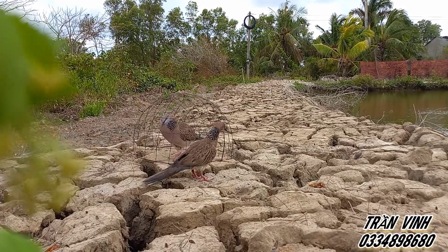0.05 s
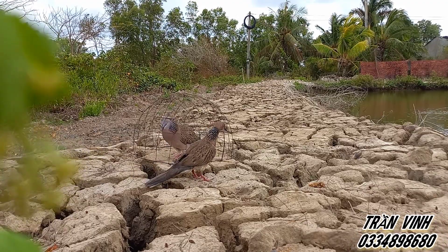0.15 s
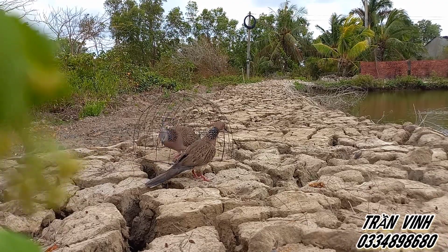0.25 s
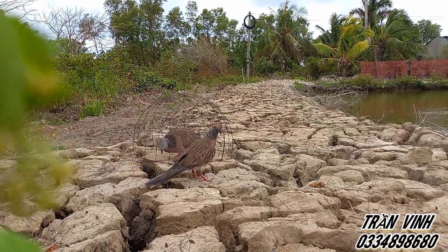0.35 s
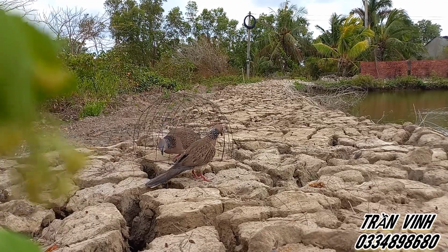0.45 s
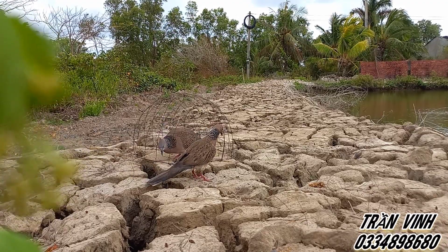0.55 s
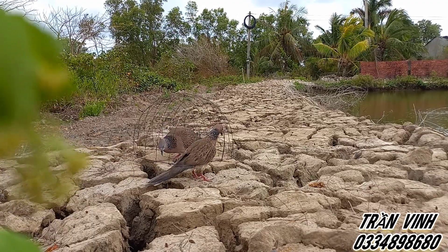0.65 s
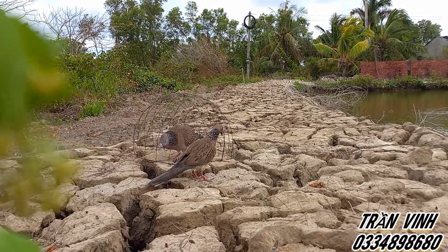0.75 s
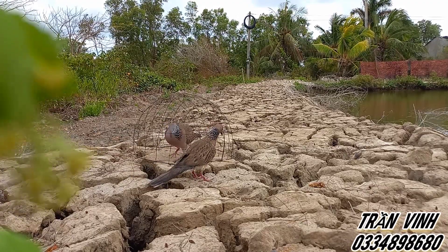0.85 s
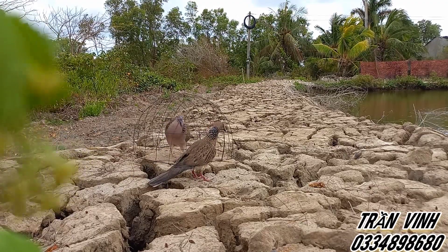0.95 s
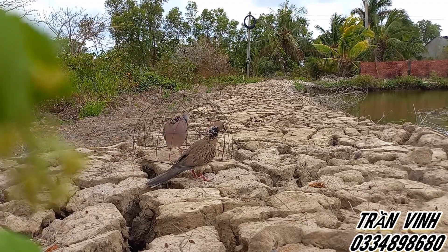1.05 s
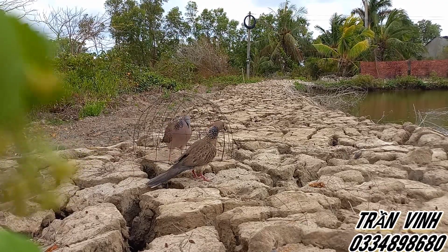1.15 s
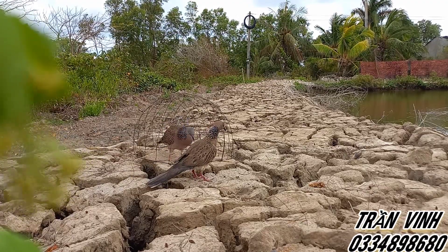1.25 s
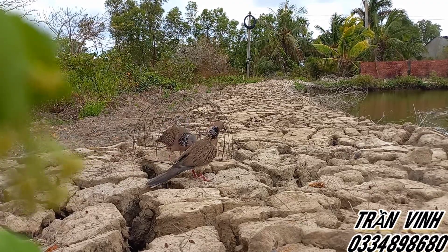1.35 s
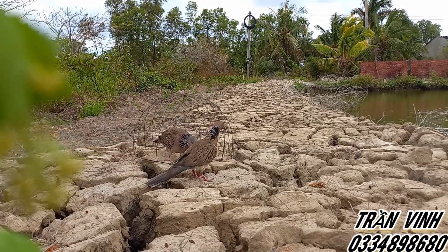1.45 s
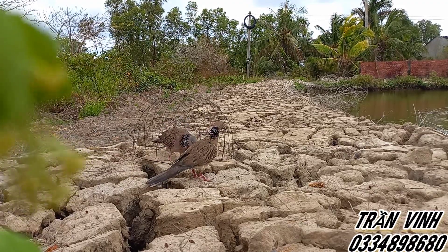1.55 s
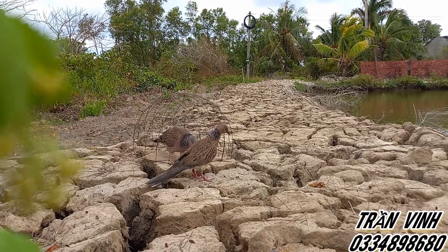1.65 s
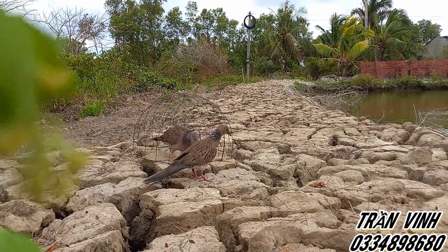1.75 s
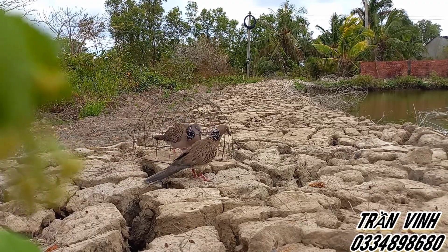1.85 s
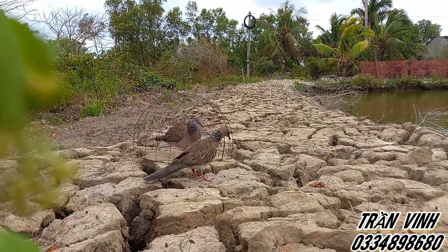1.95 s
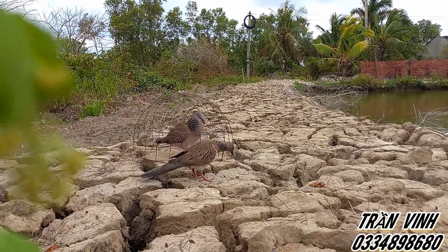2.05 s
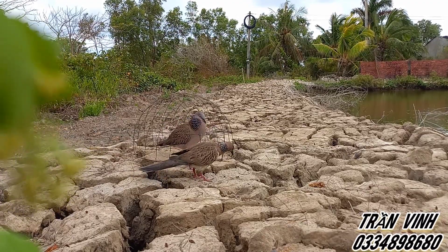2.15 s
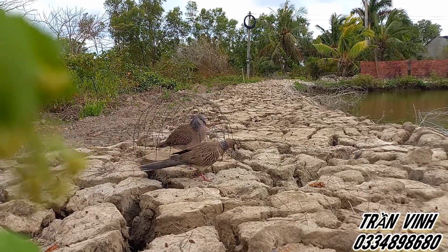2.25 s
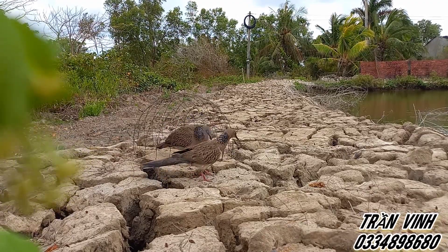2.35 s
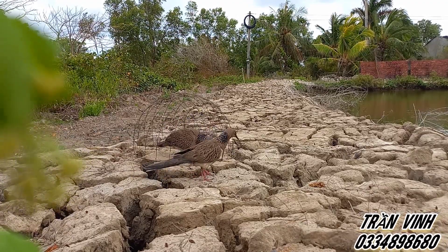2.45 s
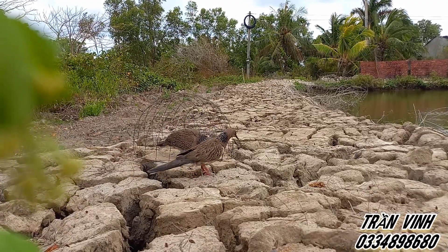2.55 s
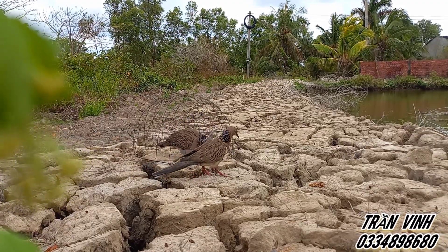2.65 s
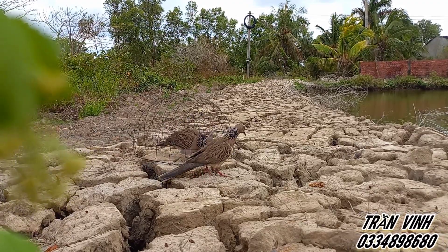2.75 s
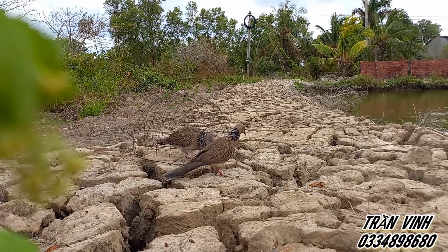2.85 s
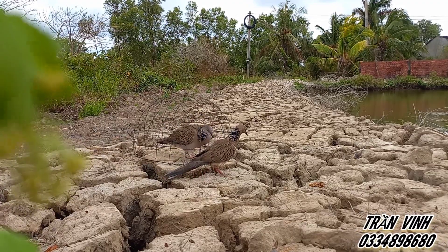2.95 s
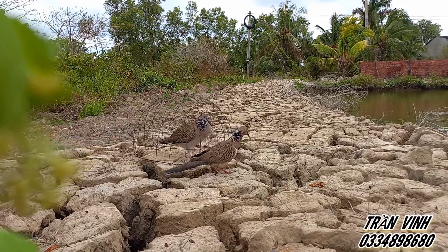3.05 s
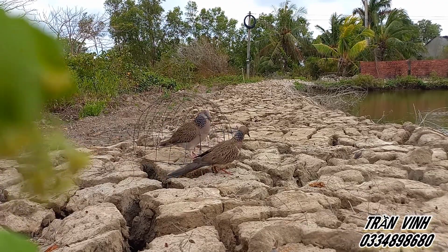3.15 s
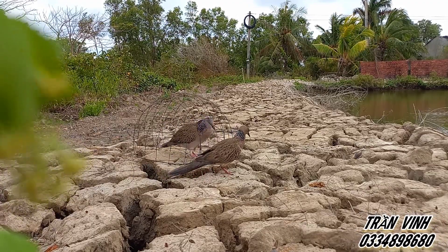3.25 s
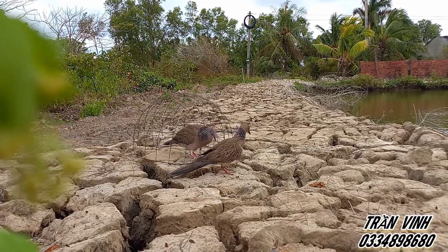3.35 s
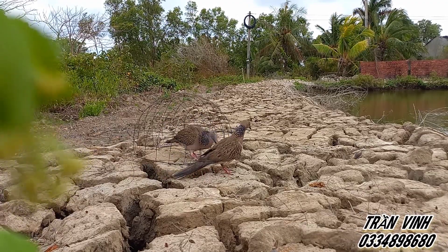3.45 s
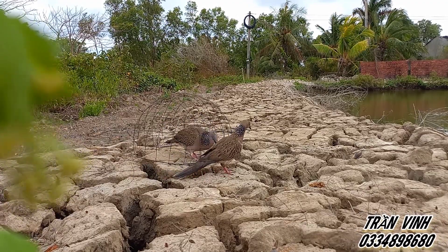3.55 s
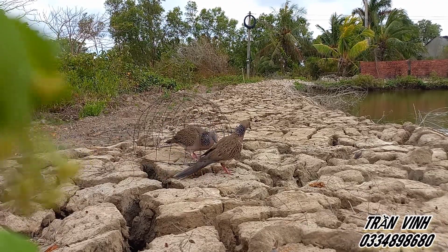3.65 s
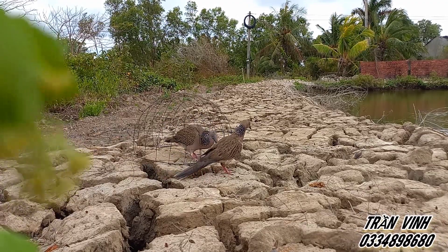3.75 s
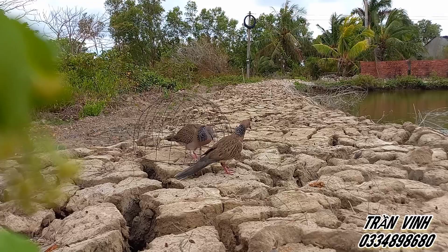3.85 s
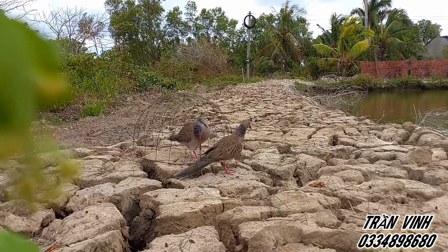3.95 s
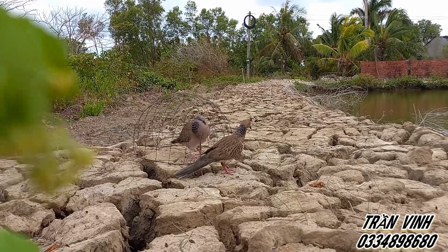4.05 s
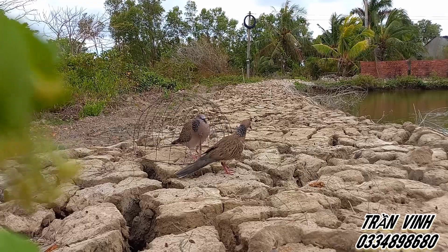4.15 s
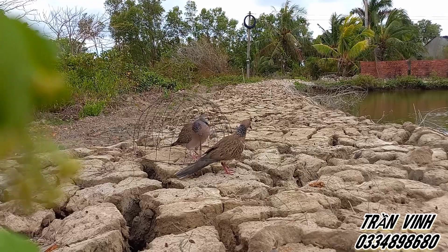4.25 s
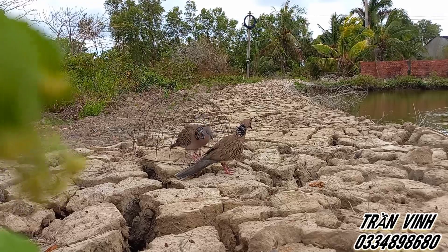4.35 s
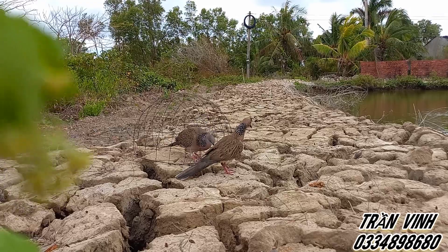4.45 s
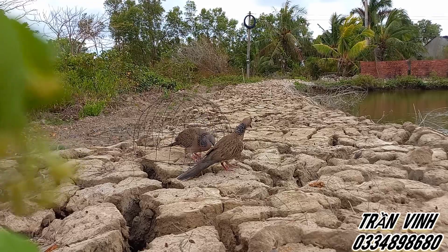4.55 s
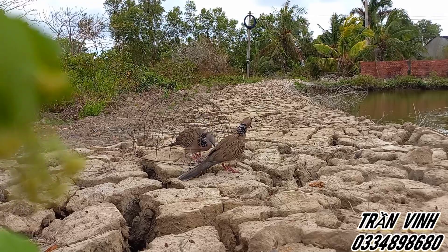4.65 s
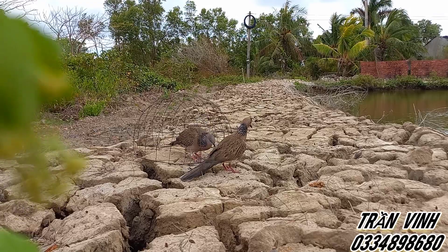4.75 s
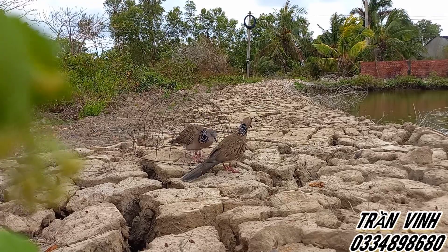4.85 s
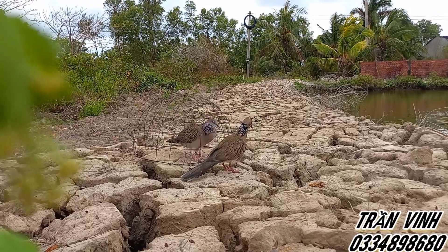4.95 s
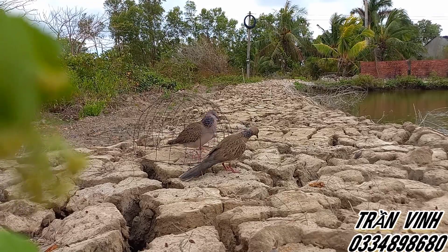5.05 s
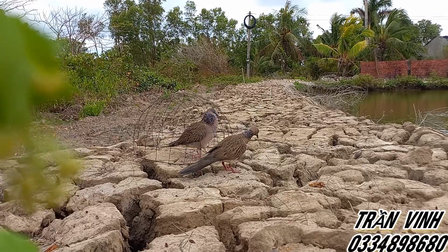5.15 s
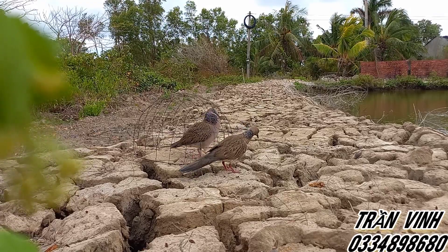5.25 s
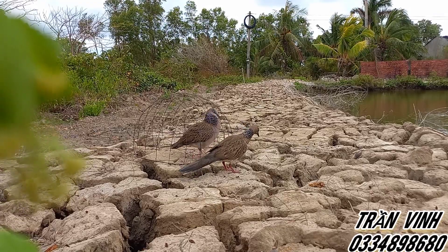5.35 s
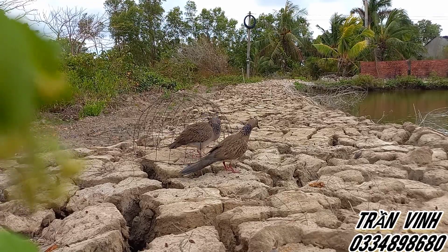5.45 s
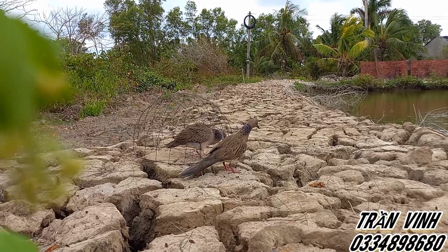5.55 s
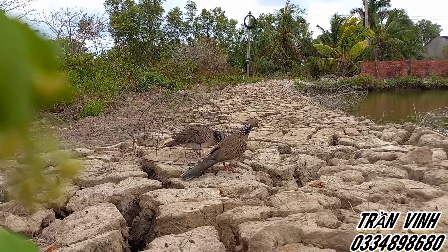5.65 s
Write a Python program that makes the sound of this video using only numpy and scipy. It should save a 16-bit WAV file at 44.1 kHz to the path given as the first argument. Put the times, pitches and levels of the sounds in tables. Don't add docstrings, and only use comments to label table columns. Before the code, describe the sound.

A dove coos close to a small stereo camera microphone on dry ground beside a pond, nearly centred and almost without echo. Five bouts begin near 0.2, 1.2, 2.3, 3.3 and 4.3 seconds. Each opens with a roll of under 0.2 seconds, rapid throaty throbs swelling in a mid-pitched purr. After a short gap, a second roll starts near 0.5, 1.55, 2.65, 3.6 and 4.6, settling into a smooth, hollow, whistle-like tone with small throat catches, sagging and sliding down by about 1, 2, 3.1, 4 and 5 seconds. Later bouts are slightly softer. Tiny bright ticks of beak or claws fall around 0.2, 1.0, 1.2, 2.3, 3.3, 3.4, 3.9 and 4.3. Very quiet engine drone, air hiss, insect shimmer and faint cricket chirrs lie beneath, swelling with the coos; low wind flutters on the right, strongest near 0.9. After the last coo, only faint background remains.

```python
import sys
import numpy as np
from scipy import signal
from scipy.fft import rfft, irfft
from scipy.io import wavfile
from scipy.ndimage import uniform_filter1d, map_coordinates

SR = 44100
rng = np.random.default_rng(int(sys.argv[2]) if len(sys.argv) > 2 else 0)


def transcribe(u):
    v = np.clip(np.atleast_2d(u).T, -1, 1)
    q = np.round(v * 32767).astype(np.int16)
    wavfile.write(sys.argv[1], SR, q)


def voltage_ratio(level):
    return 10 ** (np.asarray(level, float) / 20)


N = 251370

# (start [s], length [s], level [dB], throbs [count])
LONG_ROLLS = [
    (0.5214, 0.17, 1, 16),
    (1.5504, 0.19, 0, 16),
    (2.6541, 0.16, -0.48, 13),
    (3.5947, 0.17, -0.63, 15),
    (4.6177, .148, -1.9, 13),
]


def unit(x):
    return x / np.sqrt(np.mean(x ** 2) + 1e-20)


def along(points, hz):
    f, v = np.transpose(points)
    return np.interp(np.log(hz + 1), np.log(f + 1), v)


def wobble(rate):
    knots = rng.standard_normal(int(N * rate / SR) + 4)
    return map_coordinates(knots, [np.arange(N) * rate / SR])


def noise(gain, patchy_db):
    z = signal.stft(rng.standard_normal(N), nperseg=512)[2]
    field = uniform_filter1d(rng.standard_normal(z.shape), size=5, axis=0)
    field = uniform_filter1d(field, size=8, axis=1)
    x = signal.istft(z * voltage_ratio(patchy_db * unit(field)), nperseg=512)[1][:N]
    return unit(irfft(rfft(x) * gain(np.fft.rfftfreq(N, 1 / SR)), N))


def engine(opening):
    # (pitch [Hz], level [dB])
    drone_colour = [(20, -37), (45, -23), (63, -6.5), (90, -4), (110, -9), (127, 3), (150, -11.5),
                    (200, -10.5), (250, -16), (280, -10), (320, -19), (500, -27), (900, -40), (1200, -120)]
    # (time [s], level [dB])
    engine_level = [(0, -51.5), (.15, -46), (.5, -52), (.85, -46), (1.3, -53), (1.75, -49.5), (2.25, -55),
                    (2.7, -52.5), (3.4, -51.5), (3.75, -57), (3.96, -48), (4.3, -53.5), (4.9, -49),
                    (5.3, -61), (5.7, -51.5)]
    # (from [s], to [s])
    lulls = [(2.44, 2.94), (2.97, 3.57), (3.87, 4.12), (4.21, 4.27), (4.43, 4.66), (4.82, 5.06)]
    cut_db, cut_lift_db = -25, 6.5
    t = np.arange(N) / SR
    lull = uniform_filter1d(sum(1. * (t > a) * (t < b) for a, b in lulls), size=900)
    drone, other = [noise(lambda hz: voltage_ratio(along(drone_colour, hz)), patchy_db=3.5) for _ in range(2)]
    level = voltage_ratio(np.interp(t, *np.transpose(engine_level)) + 0.33 * wobble(21))
    in_lull = lull * (0.65 * drone + .5 * other)
    through_cut = voltage_ratio(cut_db + cut_lift_db * opening) * (0.83 * drone + .65 * other)
    return level * np.array([drone, in_lull + through_cut])


def wind(opening):
    # (pitch [Hz], level [dB])
    flutter_colour = [(40, -36), (150, -20), (220, -20), (320, 3.5), (450, 1), (600, -12.5), (900, -26),
                      (1300, -120)]
    # (time [s], level [dB])
    gusts = [(0, -53), (.3, -61.5), (.55, -62.5), (.9, -43.5), (1.15, -67.5), (1.35, -48.5), (1.55, -66.5),
             (1.7, -50.5), (2.1, -66), (2.45, -71), (3, -65.5), (3.5, -72.5), (3.7, -56.5), (4.1, -73.5),
             (4.45, -61), (5, -65), (5.3, -74.5), (5.7, -75.5)]
    lift_db = 9
    flutter = noise(lambda hz: voltage_ratio(along(flutter_colour, hz)), patchy_db=1.0)
    flutter = unit(voltage_ratio(1.0 * wobble(25)) * flutter)
    gust_db = np.interp(np.arange(N) / SR, *np.transpose(gusts))
    return voltage_ratio(gust_db + lift_db * opening) * flutter * [[0], [1]]


def air(opening):
    # (pitch [Hz], level [dB])
    air_colour = [(240, -43.5), (400, -16.5), (535, -5), (860, -9.5), (929, -8), (1660, -12.5), (3210, -17),
                  (4780, -20), (6300, -19), (15500, -18.5)]
    hiss = [noise(lambda hz: voltage_ratio(along(air_colour, hz)), patchy_db=2.2) for _ in "LR"]
    return voltage_ratio(-69 + 5.5 * opening) * np.array(hiss)


def shimmer(opening):
    # (centre [Hz], width [Hz], level [dB], left raised and right lowered by [dB], noise reducer's lift
    # [dB])
    bands = [
        (8520, 590, -81.5, 2.5, 7.5),
        (2000, 510, -82, -2.5, 8),
        (1200, 290, -90, 0, 22.5),
    ]
    out = np.zeros((2, N))
    for centre_hz, width_hz, level_db, pan_db, lift_db in bands:
        song = [noise(lambda hz: np.exp(-((hz - centre_hz) / width_hz) ** 2), patchy_db=-1.5) for _ in "LR"]
        level = voltage_ratio(level_db + lift_db * opening + 1.6 * wobble(8.7))
        out += level * np.array(song) * voltage_ratio([[pan_db], [-pan_db]])
    return out


def cricket():
    # (middle [s], half length [s], level [dB])
    phrases = [(0.638, 0.095, -78), (1.673, 0.063, -80), (2.794, 0.073, -83), (3.749, 0.065, -86),
               (4.722, 0.079, -78.5)]
    t = np.arange(N) / SR
    swell = sum(voltage_ratio(db) * np.exp(-((t - s) / half) ** 2) for s, half, db in phrases)
    chirr = [noise(lambda hz: np.exp(-((hz - 6450) / 110) ** 2), patchy_db=3.0) for _ in "LR"]
    return swell * np.array(chirr)


def ticks():
    # (time [s], peak [dB], ring pitch [Hz], left over right [dB])
    taps = [(0.1877, -48, 8820, 11), (0.9978, -49, 8680, 4), (1.2217, -53, 10300, -1),
            (2.3317, -56.5, 10800, 7), (3.286, -56, 8370, 11.5), (3.4189, -50, 7180, -2.5),
            (3.9048, -48, 8230, -2), (4.3044, -51, 7560, 1.5)]
    out, t = np.zeros((2, N)), np.arange(SR // 100) / SR
    for s, peak_db, hz, pan_db in taps:
        fade = voltage_ratio(peak_db - 3 - 60 * t / 0.0044) * (1 - np.exp(-t / .0002))
        ring = fade * (np.sin(2 * np.pi * hz * t) + .5 * rng.standard_normal(len(t)))
        both = np.diff(ring, prepend=0) * voltage_ratio([[pan_db / 2], [-pan_db / 2]])
        out[:, round(s * SR):][:, :len(t)] += both
    return out


def throbs(rows, shape, scatter):
    gap_scatter, db_scatter, hz_scatter, depth_scatter_db = .05, 1, 14, 3
    hz_per_db = 14
    share, peaks, pitches, depths, gaps = np.transpose(shape)
    fine = np.linspace(0, 1, num=200)
    beats = np.cumsum(1 / np.interp(fine, share, gaps))
    beats = (beats - beats[0]) / (beats[-1] - beats[0])
    for (start, length, level_db, count), luck in zip(rows, rng.standard_normal((len(rows), 4, 30))):
        k = np.arange(round(count) + 1)
        luck = scatter * np.clip(luck[:, k], -2, 1) * (k > 0) * (k < k[-1])
        at = np.interp((k + gap_scatter * luck[0]) / k[-1], beats, fine)
        louder_db = db_scatter * luck[1]
        peak_db = np.interp(at, share, peaks) + level_db + louder_db
        pitch_hz = np.interp(at, share, pitches) + hz_scatter * luck[2] + hz_per_db * louder_db
        depth_db = np.maximum(np.interp(at, share, depths) + depth_scatter_db * luck[3], 0)
        weaker_side_db = np.minimum(peak_db, np.r_[peak_db[1:], 0])
        yield start + at * length, peak_db, pitch_hz, weaker_side_db - depth_db


def roll(glide_hz, reach, flip):
    # (start [s], length [s], level [dB], throbs [count])
    short_rolls = [(.2003, 0.19, 1, 18), (1.2337, 0.19, 1, 17), (2.3449, 0.18, 0, 17),
                   (3.2995, .17, -0.5, 18), (4.3169, 0.18, -1, 18)]
    # (share of its length [0-1], peak [dB], pitch [Hz], valley depth [dB], throb gap
    short_shape = [(0, -41, 523.4, 0, 10), (.1, -22.5, 648.8, 11, 9.1), (0.199, -21.5, 704, 15, 14),
                   (.4, -19, 674.7, 13, 11.3), (.54, -17.5, 634.4, 8.5, 10), (.72, -14.5, 689.5, 10.5, 10),
                   (.88, -15, 643.1, 11, 11), (0.946, -28.5, 542.7, 17, 8.3), (1, -54, 463, 0.5, 9)]
    long_shape = [(0, -41, 585, 0.5, 10), (0.099, -32, 612, 4.5, 12.6), (.17, -19.5, 690, 17, 11.2),
                  (0.349, -17.5, 706, 16.5, 15.7), (.7, -16, 685.8, 13, 9.8), (1, -16, 693.5, 14.5, 12)]
    hz, size = np.full(N, 500.), np.zeros(N)
    rolls = [*throbs(short_rolls, short_shape, 1), *throbs(LONG_ROLLS, long_shape, 1.6)]
    for s, peak_db, centre_hz, valley_db in rolls:
        n = np.arange(int(s[0] * SR), int(s[-1] * SR))
        place = np.interp(n / SR, s, np.arange(len(s)))
        k, u = place.astype(int), place % 1
        side_db = np.where(u < .5, peak_db[k], peak_db[k + 1])
        throat_open = abs(np.cos(np.pi * u)) ** 2.1
        deep = np.clip((np.minimum(peak_db[k], peak_db[k + 1]) - valley_db[k] - 13.5) / 3, 0, 1)
        valley = voltage_ratio(valley_db[k]) * (1 - flip * deep)
        size[n] = throat_open * voltage_ratio(side_db) + (1 - throat_open) * valley
        swing = glide_hz * np.clip((peak_db - valley_db) / 12, 0, 1)[:-1]
        gap = np.diff(s) * min(reach, .45)
        times = np.c_[s[:-1], s[:-1] + gap, s[1:] - gap].ravel()
        pitches = np.c_[centre_hz[:-1], centre_hz[:-1] + .25 * swing, centre_hz[1:] - swing].ravel()
        hz[n] = np.interp(n / SR, times, pitches)
    return hz, size


def held(drop_hz, rebound, settle_s):
    # (break [s], top pitch [Hz], level [dB], tail [s])
    tones = [(.889, 760.4, -20, .083), (1.937, 757, -20, .079), (3.009, 753, -22, .071),
             (3.943, 749.6, -21.5, 0.07), (4.984, 746.6, -22, .068)]
    # (time [s], share of the tone lost [0-1], half length [s])
    catches = [(.713, 0.76, 0.0051), (0.783, 0.7, 0.0034), (0.809, 0.3, 0.003), (1.749, .7, .008),
               (1.782, 0.85, 0.004), (1.803, 0.7, .0045), (2.822, .8, 0.0055), (2.844, 0.91, 0.0049),
               (3.874, 0.5, 0.0034), (4.785, 0.72, 0.0034), (4.81, 0.7, 0.0026)]
    # (time from it [s], pitch drop [Hz], gain [dB])
    sagging = [(-.22, 0, -.3), (-.15, 7, 0), (-.09, 20, .5), (-.045, 40, 1.5), (-.02, 62, 3), (0, 92, 4.5)]
    # (share of the tail [0-1], pitch drop [Hz], gain [dB])
    tail_shape = [(.08, 110, 3.5), (.16, 165, -4.5), (.63, 195, -8), (.82, 275, -19), (1, 350, -30)]
    hz, size, t = np.zeros(N), np.zeros(N), np.arange(N) / SR

    def bump(s, half):
        return np.exp(-((t - s) / half) ** 2 * 2)

    choke, low, surge = np.zeros((3, N))
    for s, share, half in catches:
        choke += share * bump(s, half)
        low += share * np.sqrt(half / 0.0047) * bump(s + 0.78 * half, 1.6 * half)
        surge += share * (bump(s + 1.4 * half, half) - .4 * bump(s + 2.8 * half, .6 * half))
    for (roll_s, length, *_), (knee, top_hz, note_db, tail) in zip(LONG_ROLLS, tones):
        start = roll_s + length
        sliding = [(share * tail, fall_hz, db) for share, fall_hz, db in tail_shape]
        s, sag_hz, gain_db = np.transpose(sagging + sliding)
        on = (t >= start - 1 / 1000) & (t < knee + tail)
        after = t[on] - knee
        last = np.exp(-np.maximum(t[on] - start, 0) / settle_s)
        hz[on] = top_hz - np.interp(after, s, sag_hz) - drop_hz * low[on] - 45 * last
        strength = np.sqrt(2) * voltage_ratio(note_db + np.interp(after, s, gain_db) + 2.5 * last)
        size[on] = strength * np.clip(1 - choke[on] + rebound * surge[on], 0, 2)
    return hz, size


def dove():
    # (pitch [Hz], level [dB])
    overtone = [(400, -52.5), (480, -62), (560, -71.5), (600, -79), (680, -65.5), (750, -72)]
    roll_hz, roll_size = roll(glide_hz=94.44, reach=0.35, flip=5.9)
    held_hz, held_size = held(drop_hz=150, rebound=.5, settle_s=.004)
    hz = uniform_filter1d(np.where(held_hz > 0, held_hz, roll_hz), size=70) + 4.4 * wobble(150)
    size = np.where(held_hz > 0, held_size, roll_size)
    size = signal.fftconvolve(size, np.hanning(130) / 64.5, "same")
    size = size * voltage_ratio(0.3 * wobble(100))
    phase = 2 * np.pi * np.cumsum(hz) / SR
    rolling = uniform_filter1d(1. * (held_hz == 0), size=600)
    second = np.sqrt(2) * voltage_ratio(along(overtone, hz) + 2.5 * wobble(70))
    second = second * np.clip(size / 0.0067, 0, 1) * (1 - 0.54 * rolling)
    breath = noise(lambda f: np.exp(-((f - 800) / 250) ** 2), patchy_db=2)
    rasp = voltage_ratio(-32) * size * (0.34 + rolling) * breath
    return size * np.sin(phase) + second * np.sin(2 * phase + 0.23 * wobble(120)) + rasp


def banks(x):
    # (pitch [Hz], time to fall 60 dB [s])
    fading = [(400, 0.15), (720, 0.27), (4000, .05)]
    hz, t, z = signal.stft(rng.standard_normal((2, SR // 4)), SR, nperseg=256)
    fade_db = -60 * t / along(fading, hz)[:, None]
    dull_db = -60 * (hz > 2000)[:, None]
    tail = signal.istft(z * voltage_ratio(fade_db + dull_db), SR, nperseg=256)[1]
    late = np.pad(x, (200, 0))[None]
    return signal.fftconvolve(late, tail / np.linalg.norm(tail[0]), axes=1)[:, :N]


def scene():
    bird = dove()
    loud_db = 10 * np.log10(abs(uniform_filter1d(bird ** 2, size=3000)) + 1e-9)
    opening = uniform_filter1d(np.clip((loud_db + 44.0) / 30, 0, 1), size=1500)
    lead = .35 * np.gradient(bird) * [[1], [-1]]
    low_end = voltage_ratio(4.2 * opening - 1.5) * (engine(opening) + wind(opening))
    background = low_end + air(opening) + shimmer(opening) + cricket()
    return background + ticks() + bird + lead + voltage_ratio(-40) * banks(bird)


def roll_off(x):
    return signal.sosfilt(signal.butter(12, 15690, fs=SR, output="sos"), x)


def record(dry):
    kept = irfft(rfft(dry) * (np.fft.rfftfreq(N, 1 / SR) < 15700), N)
    return roll_off(kept)


dry = scene()
out = record(dry)
transcribe(out)
```